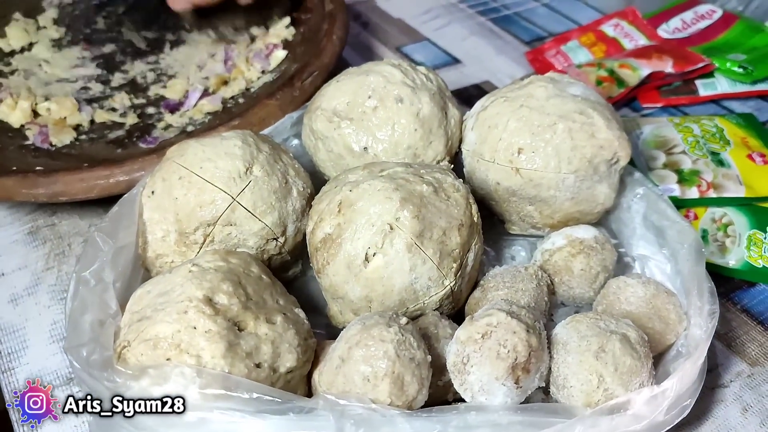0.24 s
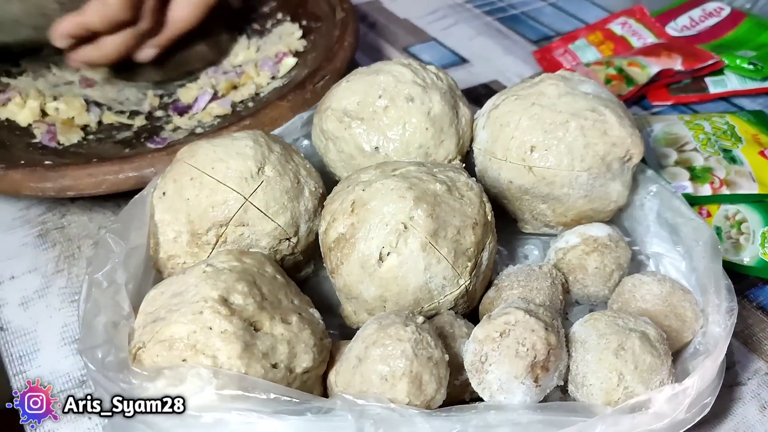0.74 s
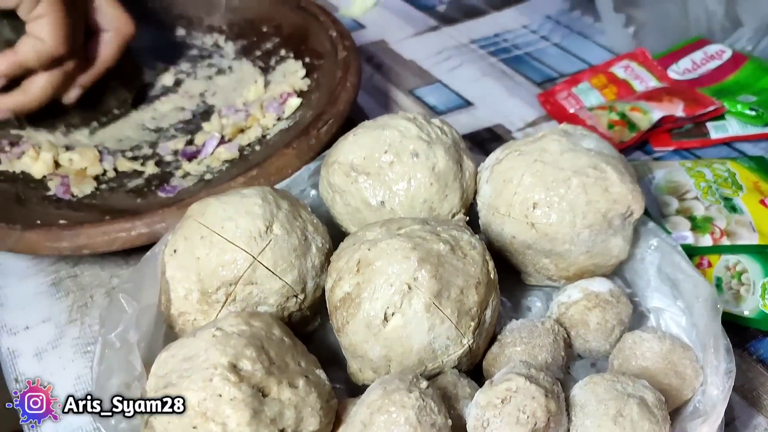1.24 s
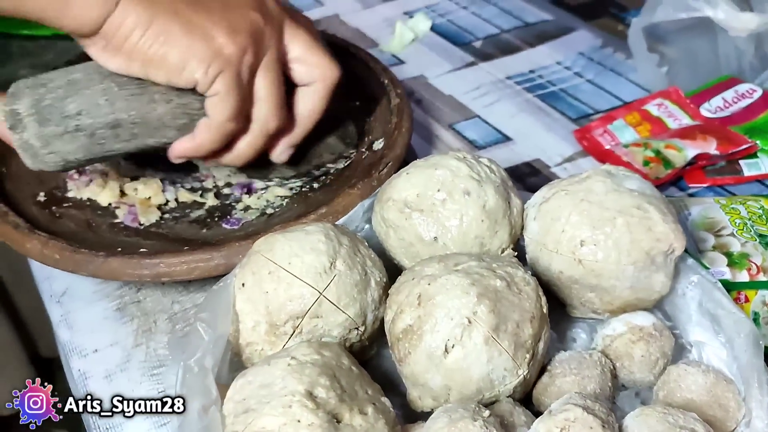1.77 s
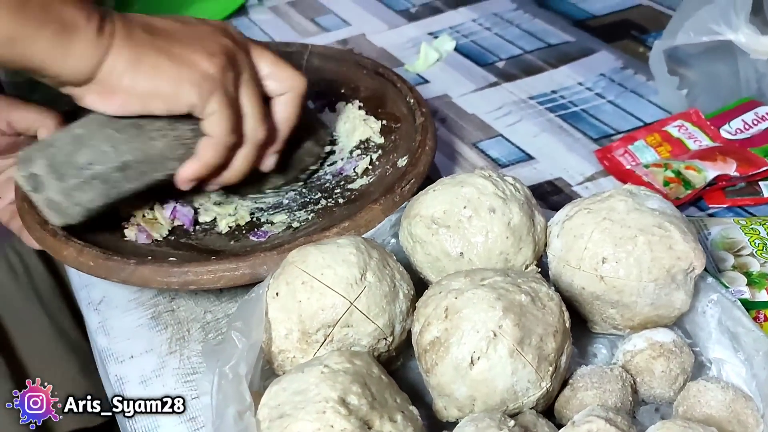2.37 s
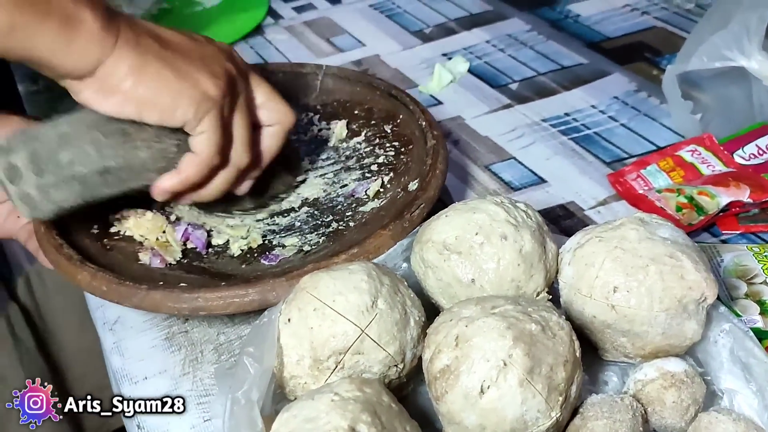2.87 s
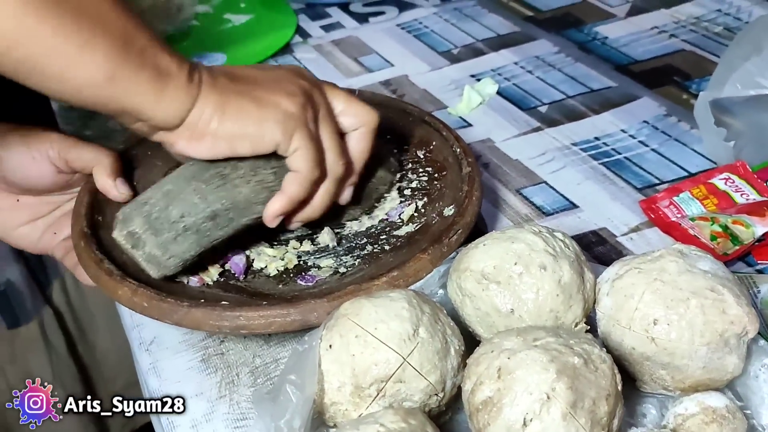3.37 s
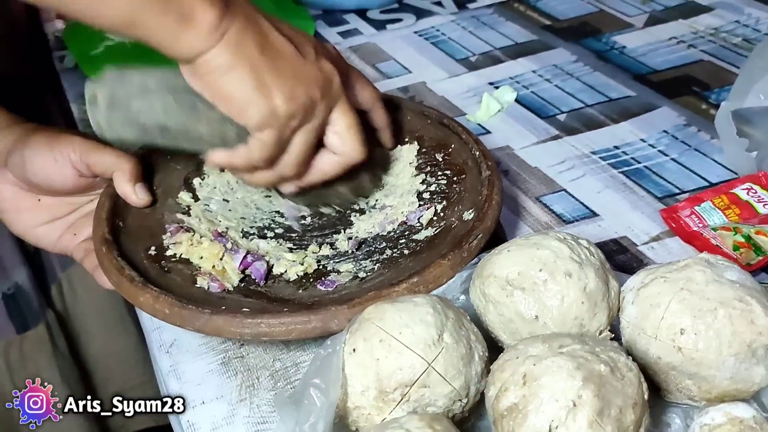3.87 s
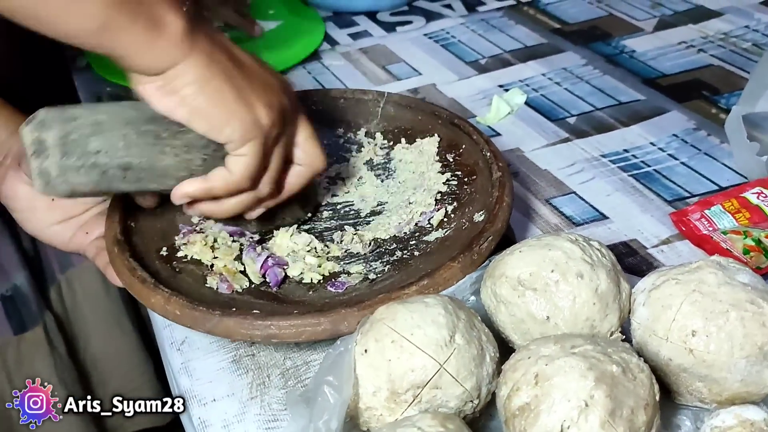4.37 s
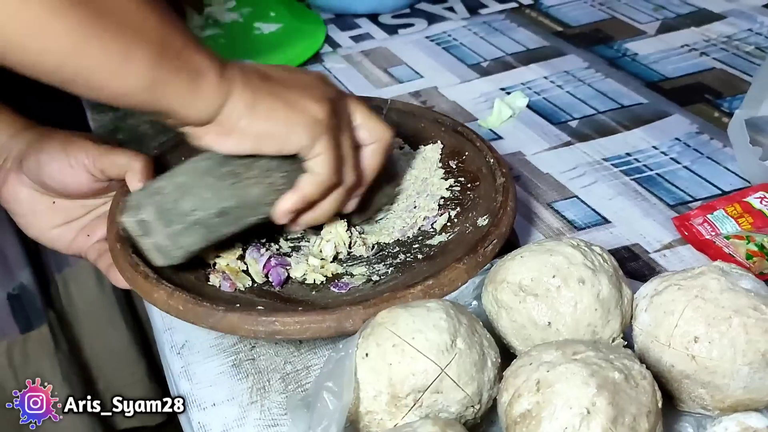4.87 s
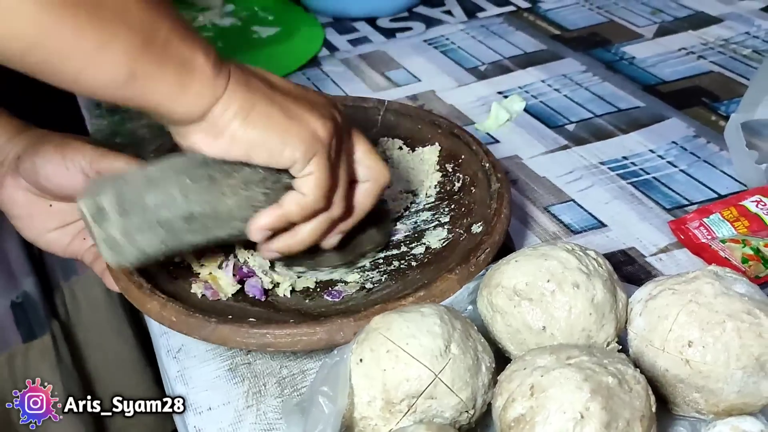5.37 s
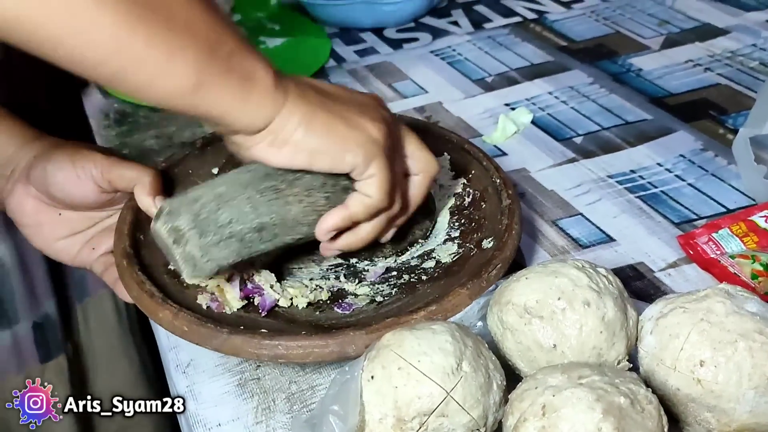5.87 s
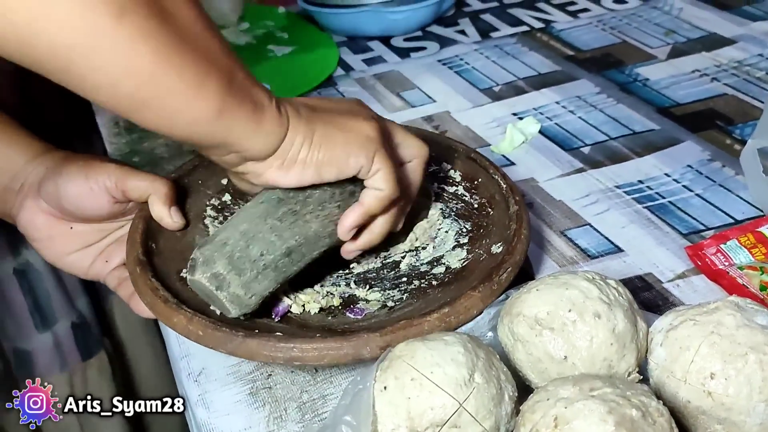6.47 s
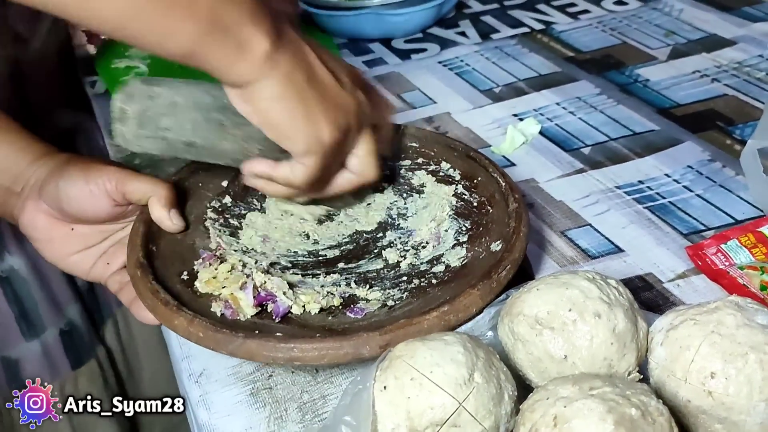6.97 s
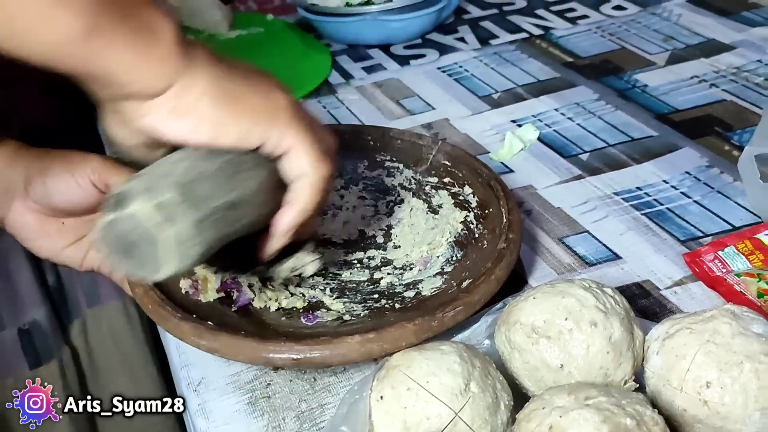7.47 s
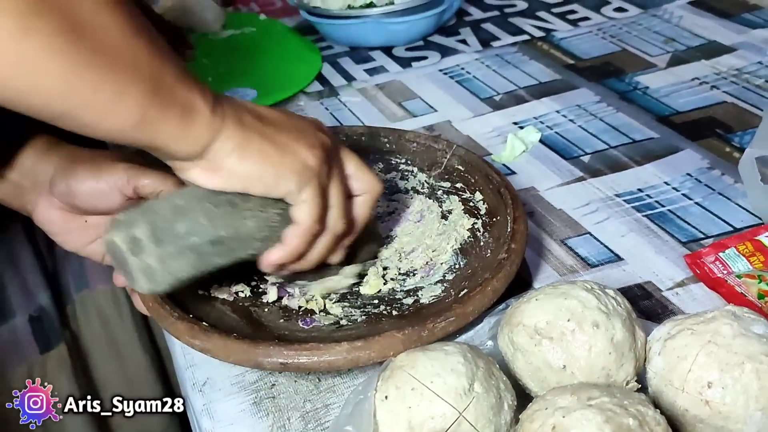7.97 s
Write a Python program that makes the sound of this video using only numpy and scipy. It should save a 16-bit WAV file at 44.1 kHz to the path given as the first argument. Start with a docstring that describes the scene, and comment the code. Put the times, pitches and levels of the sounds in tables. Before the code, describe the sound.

Quick, gritty scraping runs throughout as a stone pestle crushes moist spices in a clay dish on a kitchen table, heard up close with little echo. The strokes come in spells with very brief pauses, dotted with short clacks as the stone lands or jumps off a lump. Seeds click now and then and the table bumps softly underneath. The loudest sound, a deep thud of the dish settling, comes just before the end.

```python
"""Pestle grinding spices in a clay mortar

A stone pestle slides to and fro in spells, close by: grit rings the shallow dish, moist paste hisses,
seeds snap. The stone knocks on the clay as it lands or jumps off a lump. The dish rocks and thuds on
the kitchen table, which rumbles under the work."""
import sys
import numpy as np
from scipy import signal
from scipy.fft import rfft, irfft, next_fast_len
from scipy.io import wavfile
from scipy.ndimage import uniform_filter1d, map_coordinates

SR = 44100
rng = np.random.default_rng(int(sys.argv[2]) if len(sys.argv) > 2 else 0)


def int16_out(signal):
    """Quantize to a 16-bit WAV file."""
    q = np.round(np.clip(np.atleast_2d(signal).T, -1, 1) * 32767)
    wavfile.write(sys.argv[1], SR, q.astype(np.int16))


N = 362489
T = np.arange(N) / SR

# modes of the dish: (frequency [Hz], level [dB], t60 [s])
CLAY_MODES = [(371, -8.5, 0.039), (603, -10.5, 0.16), (780, -8.5, 0.094), (1110, -4.5, 0.011),
              (1288, 6.5, 0.027), (1476, 4, 0.025), (2130, -3.5, 0.031), (2512, -3, 0.023)]
# spectrum of crushed spice: (frequency [Hz], level [dB])
CRUNCH_SPECTRUM = [(300, 3), (1500, 14.5), (3200, 11.5), (6500, 4.5), (12000, -15)]
# pestle set down: (time [s], ring [dB], crunch [dB], thud [dB], push [Hz])
LANDINGS = [(0.342, -29.5, -47, -17.5, 156), (1.749, -17.5, -21, -21, 230), (2.697, -20, -31.5, -23.5, 228),
            (5.225, -23.5, -33, -27, 157), (6.111, -31.5, -40.5, -25.5, 217), (6.185, -16, -20, -20.5, 380)]
# stone jumps off a lump onto the clay: (time [s], ring [dB], crunch [dB])
KNOCKS = [(1.401, -16, -32.5), (1.879, -42, -31.5), (2.721, -29, -46), (2.804, -27, -37), (3.406, -25, -33),
          (3.776, -17, -22.5), (4.228, -20.5, -41), (4.867, -37, -39), (5.528, -27.5, -55),
          (6.859, -22, -34), (7.228, -38.5, -30.5), (7.795, -17.5, -25.5)]


def undb(db):
    """Decibels to gain."""
    return np.exp(np.asarray(db) * (np.log(10) / 20))


def unit(x):
    """Scale to rms 1."""
    return x / np.sqrt(np.mean(x ** 2))


def butter(x, order, hz, kind="low"):
    """Butterworth filter."""
    return signal.sosfilt(signal.butter(order, hz, kind, fs=SR, output="sos"), x)


def gain_at(outline, hz):
    """Gain of a (Hz, dB) outline on a log-frequency axis."""
    f, db = np.transpose(outline)
    return undb(np.interp(np.log(hz + 1), np.log(f), db))


def convolve(x, response):
    """Convolve, keeping the length; rows are channels."""
    return signal.oaconvolve(np.atleast_2d(x), np.atleast_2d(response), axes=-1)[:, :x.shape[-1]]


def colour(x, outline, size=4096):
    """Minimum-phase filter with a (Hz, dB) outline."""
    cepstrum = irfft(np.log(gain_at(outline, np.arange(size // 2 + 1) * SR / size)))
    cepstrum[1:size // 2] *= 2
    cepstrum[size // 2 + 1:] = 0
    return convolve(x, irfft(np.exp(rfft(cepstrum))))


def add(out, time_s, x, db):
    """Mix in a blow; db is the rms of its loudest 10 ms."""
    i = int(time_s * SR)
    x = x[:, :N - i]
    loudest = np.max(uniform_filter1d(np.mean(x ** 2, axis=0), SR // 100, mode="constant"))
    out[:, i:i + x.shape[1]] += x * undb(db) / np.sqrt(loudest)


def wander(rate_hz):
    """Smooth random drift, rms 1."""
    hold = int(SR / rate_hz)
    steps = np.repeat(rng.standard_normal(N // hold + 1), hold)
    return unit(uniform_filter1d(uniform_filter1d(steps, hold), hold)[:N])


def swells(events):
    """Bell-shaped gain for each (time [s], half length [s], level [dB])."""
    time_s, half_s, db = np.transpose(events)[:, :, None]
    t = T[::100]
    bells = undb(db) * np.exp(-((t - time_s) / half_s) ** 2 / 2)
    return np.interp(T, t, np.sum(bells, axis=0))


def grains(per_s, spread_db=0):
    """Tiny fractures: mostly small, a few large."""
    size = undb(spread_db * np.minimum(rng.exponential(size=N), 5))
    return unit((rng.random(N) < per_s / SR) * size * rng.standard_normal(N))


def patchy(x, depth_db=2.5, width_hz=300, hold_s=0.024):
    """The stone rides over lumps: narrow bands flare and fade at random."""
    hz, t, spectrum = signal.stft(x, SR, nperseg=512)
    lumps = rng.standard_normal((128, 1024))
    grid = np.meshgrid(hz / width_hz, t / hold_s, indexing="ij")
    flare_db = depth_db * map_coordinates(lumps, grid, mode="mirror")
    return signal.istft(spectrum * unit(undb(flare_db)), SR)[1][:, :N]


def ring(modes, t, scatter_db, rad_per_khz=0.25):
    """Stereo modal response: each contact reweights the modes; high ones radiate unevenly."""
    hz, db, t60_s = np.transpose(modes)[:, :, None]
    weight, side = rng.standard_normal((2, len(modes), 1))
    decay = undb(db + scatter_db * weight) * np.exp(-np.log(1000) * t / t60_s)
    phase = rad_per_khz * side * hz / 1000
    return np.array([np.sum(decay * np.sin(2 * np.pi * hz * t + ear * phase), axis=0) for ear in (-1, 1)])


def room(x, wet_db, t60_s, echo=0):
    """Direct sound, optional wall echo and a diffuse tail with its bass alike in both ears."""
    t = T[:SR // 4]
    mid, side = rng.standard_normal((2, len(t)))
    diffuse = mid + np.array([[1], [-1]]) * butter(side, 2, 480, "high")
    tail = diffuse * np.exp(-np.log(1000) * t / t60_s) * (1 - np.exp(-t / 0.0023))
    response = unit(tail) * undb(wet_db) / np.sqrt(len(t))
    response[:, 0] += 1
    response[:, int(0.0118 * SR)] += echo
    return convolve(x, response)


def room_tone():
    """Shared bass and a faint hiss in each ear."""
    # (frequency [Hz], level [dB])
    spectrum = [(200, -4), (900, -19), (2500, -21), (15500, -53)]
    bass = unit(colour(rng.standard_normal(N), spectrum)) * undb(-55)
    return bass + undb(-84) * rng.standard_normal((2, N))


def table_rumble(hiss_db, follow=0.21):
    """The table shudders under the work, most as the dish is first leant on."""
    # (frequency [Hz], level [dB])
    spectrum = [(15, -5.5), (28, 5.5), (65, -1.5), (90, -7), (120, -1), (160, -14.5), (800, -57.5)]
    # base shudder: (time [s], level [dB])
    shudder = [(0.06, -29.5), (0.2, -40.5), (7.0, -43.5)]
    effort_db = uniform_filter1d(hiss_db - np.mean(hiss_db), SR // 8)
    level_db = np.interp(T, *np.transpose(shudder)) + follow * effort_db + 2 * wander(12)
    return unit(colour(rng.standard_normal(N), spectrum)) * undb(level_db)


def pushes(knock_db=-9, knock_hz=370, rock_hz=164.6, rock_db=-33, db_per_octave=17):
    """Pushes of the dish on the table: (time [s], level [dB], pitch [Hz]); harder rocks are higher."""
    # dish rocks as the weight shifts: (time [s], level [dB])
    rocks = [(0.203, -22), (0.263, -31.5), (0.536, -34), (0.904, -30), (1.179, -30), (1.566, -27),
             (1.618, -32), (2.305, -33), (2.596, -32), (2.733, -28.5), (3.266, -33), (4.099, -32),
             (4.467, -35), (5.101, -34.5), (6.03, -33), (6.745, -29.5)]
    landed = [(time_s + 0.0028, db, hz) for time_s, _, _, db, hz in LANDINGS]
    knocked = [(time_s, db + knock_db, knock_hz) for time_s, db, _ in KNOCKS]
    rocked = [(time_s, db, rock_hz * 2 ** ((db - rock_db) / db_per_octave)) for time_s, db in rocks]
    return landed + knocked + rocked


def table_thuds(decay_cycles=0.42, direct=0.062, rattle_s=0.01, detune=0.038):
    """The dish pushes on the table and springs back; a shorter push reaches higher modes."""
    # loaded table: (frequency [Hz], level [dB], t60 [s])
    table_modes = [(121.5, 3, 0.095), (241.5, -1, 0.07), (278, 5, 0.046), (387.3, 2.5, 0.087),
                   (559, 2.5, 0.079)]
    out, t = np.zeros((2, N)), T[:SR // 4]
    for time_s, db, hz in pushes():
        push = np.sin(2 * np.pi * hz * t) * np.sqrt(hz * t) * np.exp(-hz * t / decay_cycles)
        # the hand leans differently each time, shifting the modes
        modes = [(f * (1 + detune * rng.standard_normal()), level, t60) for f, level, t60 in table_modes]
        board = ring(modes, t, scatter_db=1.5)
        # the rough foot rattles, more after a heavy blow
        rattle = rng.standard_normal((2, len(t))) * np.exp(-t / rattle_s)
        rattle = butter(rattle, 3, [250, 720], "band")
        parts = (convolve(push, board), 1), (push, direct), (rattle, undb(-6 + 0.45 * db))
        blow = sum(share * x / np.max(abs(x)) for x, share in parts)
        add(out, time_s + 0.0012, room(blow, wet_db=-3, t60_s=0.23), db)
    return out


def dish_drop(time_s=7.789, db=-6, swing_hz=114.7, swing_s=0.0065, t60_s=0.24):
    """The tipped dish drops back: the table swings, then the rough foot rumbles to rest."""
    out, t = np.zeros((2, N)), T[:SR // 2]
    swing = np.sin(2 * np.pi * swing_hz * t) * (t / swing_s) ** 2 * np.exp(2 * (1 - t / swing_s))
    jolts = butter(rng.standard_normal(len(t)), 2, [45, 160], "band")
    settling = np.tanh(unit(jolts)) * np.exp(-np.log(1000) * t / t60_s)
    add(out, time_s, np.atleast_2d(swing + 2 * undb(-7) * settling), db)
    return out


def seed_snaps(decay_s=0.0011):
    """A seed or skin gives way with one bright click."""
    # (time [s], level [dB])
    snaps = [(0.143, -43), (1.882, -31), (3.134, -45), (4.686, -32), (6.5802, -36), (7.017, -32.5)]
    out, t = np.zeros((2, N)), T[:SR // 4]
    for time_s, db in snaps:
        crack = rng.standard_normal((2, len(t))) * np.exp(-t / decay_s)
        crack = butter(crack, 1, [7500, 14500], "band")
        add(out, time_s, room(crack, wet_db=-6.5, t60_s=0.11), db)
    return out


def spice_crushes():
    """A piece collapses under the sliding stone in a swarm of fractures."""
    # (time [s], half length [s], level [dB])
    crushes = [(0.852, 0.014, -27.5), (1.226, 0.015, -31.5), (2.275, 0.009, -40), (2.814, 0.008, -31.5),
               (4.013, 0.009, -27), (4.05, 0.035, -34.5), (7.055, 0.019, -30.5)]
    swarm = np.array([grains(per_s=3300, spread_db=0.5) for _ in range(2)])
    return unit(patchy(colour(swarm, CRUNCH_SPECTRUM))) * swells(crushes)


def pestle_knocks(crush_s=0.0028, crush_decay_s=0.0017, cushion_hz=1600, detune=0.012, choke_t60_s=0.052):
    """The stone strikes the clay, then crushes what lies beneath."""
    out, t = np.zeros((2, N)), T[:SR // 8]
    for time_s, ring_db, crunch_db, *_ in LANDINGS + KNOCKS:
        # brief contact chatter, cushioned by the paste
        contact = 0.27 * rng.standard_normal(len(t)) * np.exp(-t / 0.0057)
        contact[0] += 1
        contact = butter(contact, 1, cushion_hz)
        # each blow loads the dish differently; the stone stays down and chokes the ring
        modes = [(hz * (1 + detune * rng.standard_normal()), db, 1 / (1 / t60_s + 1 / choke_t60_s))
                 for hz, db, t60_s in CLAY_MODES]
        clay = convolve(contact, ring(modes, t, scatter_db=-1.7))
        add(out, time_s, room(clay, wet_db=-4.5, t60_s=0.19, echo=0.31), ring_db)
        crush = rng.standard_normal((2, len(t))) * np.exp(-abs(t - crush_s) / crush_decay_s)
        add(out, time_s, room(colour(crush, CRUNCH_SPECTRUM), wet_db=-7.5, t60_s=0.18), crunch_db)
    return out


def drag_power(t, touch_s=0.0073, lift_db_per_s=200, idle_db=-65.5):
    """Light rubbing while the pestle is down, over a faint rustle of hands."""
    # grinding spells: (touchdown [s], lift [s], drag [dB])
    spells = [(0.0, 0.158, -48.5), (0.328, 1.556, -49.5), (1.752, 2.594, -49), (2.704, 5.13, -51),
              (5.227, 5.994, -48.5), (6.188, 7.475, -49), (7.654, 8.21, -51.5)]
    down_s, up_s, db = np.transpose(spells)[:, :, None]
    touch = np.clip((t - down_s) / touch_s, 0, 1)
    drag = touch * undb(db - lift_db_per_s * np.maximum(t - up_s, 0))
    return undb(idle_db) ** 2 + np.sum(drag ** 2, axis=0)


def stroke_levels(shape=1.99, bite_width=0.66, drag_grit_db=-10, halt_half_s=0.031, halt_depth_db=-6.5):
    """Hiss, grit and judder in dB: a stroke swells over the drag and bites in its middle."""
    # slides: (time of top speed [s], half length [s], hiss [dB], grit [dB], judder [dB])
    strokes = [(0.064, 0.045, -43, -36, -36.5), (0.464, 0.05, -41, -36.5, -37),
               (0.655, 0.058, -46.5, -41, -44), (0.857, 0.039, -41, -40, -37),
               (1.021, 0.066, -44, -38, -37), (1.245, 0.064, -43, -37.5, -43.5),
               (1.399, 0.054, -41, -35, -45), (1.914, 0.052, -42, -37.5, -36),
               (2.081, 0.047, -40, -36.5, -29.5), (2.271, 0.05, -44, -39, -37.5),
               (2.432, 0.047, -44.5, -45.5, -46), (2.83, 0.042, -35.5, -35.5, -36),
               (3.021, 0.05, -42.5, -42.5, -48), (3.224, 0.045, -39.5, -39, -41),
               (3.406, 0.044, -38.5, -33, -39), (3.607, 0.044, -37.5, -34, -39),
               (3.785, 0.06, -40.5, -37, -45), (4.038, 0.091, -38.5, -38.5, -46.5),
               (4.215, 0.059, -38.5, -34.5, -36.5), (4.408, 0.05, -35.5, -50, -44.5),
               (4.585, 0.048, -38.5, -34, -38.5), (4.761, 0.045, -36.5, -37, -41.5),
               (4.934, 0.052, -39, -35.5, -37), (5.341, 0.038, -40, -33, -38.5),
               (5.526, 0.056, -41, -37, -36.5), (5.716, 0.041, -40, -34, -34.5),
               (5.867, 0.041, -46, -37, -36.5), (6.287, 0.081, -41.5, -36.5, -41.5),
               (6.512, 0.048, -43, -35.5, -41.5), (6.701, 0.045, -36.5, -38.5, -33.5),
               (6.873, 0.052, -45.5, -39, -37), (7.063, 0.038, -42, -30.5, -37),
               (7.148, 0.052, -43.5, -38, -50), (7.297, 0.051, -40.5, -36, -40),
               (7.794, 0.059, -36.5, -38.5, -42.5), (7.971, 0.036, -37.5, -48.5, -45),
               (8.13, 0.041, -38, -42, -39.5)]
    # stone catches at a turn: (time [s])
    halts = [0.768, 3.108, 6.61]
    time_s, half_s, hiss_db, grit_db, judder_db = np.transpose(strokes)[:, :, None]
    t = T[::100]
    away = abs((t - time_s) / half_s) ** shape
    drag = drag_power(t)
    hiss = drag + np.sum(undb(hiss_db) ** 2 * np.exp(-away), axis=0)
    bite = np.exp(-away / bite_width ** 2)
    grit, judder = (drag * undb(drag_grit_db) ** 2 + np.sum(undb(db) ** 2 * bite, axis=0)
                    for db in (grit_db, judder_db))
    halted = np.exp(-((t - np.array(halts)[:, None]) / halt_half_s) ** 4)
    halt_db = halt_depth_db * np.sum(halted, axis=0)
    return [np.interp(T, t, 10 * np.log10(power) + halt_db) for power in (hiss, grit, judder)]


def paste_ticks(re_drag_db=-6):
    """Wet paste peels off the stone in sparse, tiny ticks."""
    ticks = room(grains(per_s=70), wet_db=1, t60_s=0.011)
    return unit(butter(ticks, 2, 8000, "high")) * np.sqrt(drag_power(T)) * undb(re_drag_db)


def stone_judder(judder_db):
    """Coarse stick-slip jolts give a heavy stroke its low body."""
    jolts = butter(grains(per_s=900, spread_db=1), 2, [210, 850], "band")
    return unit(patchy(room(jolts, wet_db=2, t60_s=0.026))) * undb(judder_db - 1)


def stone_chatter():
    """Fast stick-slip on bare clay, near the dish's strongest modes."""
    # stone breaks through the paste: (time [s], half length [s], level [dB])
    scrapes = [(3.592, 0.013, -44), (4.08, 0.071, -54.5), (4.19, 0.01, -36.5), (4.556, 0.011, -52.5)]
    slips = butter(grains(per_s=2400, spread_db=2.5), 2, [1330, 1750], "band")
    return unit(slips) * swells(scrapes)


def paste_hiss(hiss_db, split_hz=5000):
    """Shearing paste: wet patches fizz, dry ones scratch, so the two bands trade places."""
    # (frequency [Hz], level [dB])
    spectrum = [(200, -10), (1000, -1), (2400, 2.5), (7000, 4.5), (11700, 2.5), (14300, -1.5)]
    shear = unit(colour(np.array([grains(per_s=9000) for _ in range(2)]), spectrum))
    scratch = butter(shear, 1, split_hz)
    fizz = shear - scratch
    wetness = undb(2.37 * wander(11))
    return (scratch / wetness + fizz * wetness) * undb(hiss_db + 0.5 + 1.37 * wander(110))


def clay_ring(force, wander_db=3.5, press_t60_s=0.12):
    """The pressing stone damps the dish; modes come and go as the contact travels."""
    out, energy = 0, 0
    for hz, db, t60_s in CLAY_MODES:
        damped_t60_s = 1 / (1 / t60_s + 1 / press_t60_s)
        response = ring([(hz, db, damped_t60_s)], T[:SR // 12], scatter_db=1.5, rad_per_khz=0.89)
        out = out + convolve(force * undb(wander_db * wander(15)), response)
        energy += np.sum(response ** 2) / 2
    return out / np.sqrt(energy)


def grinding(hiss_db, grit_db):
    """Grit catches, breaks and rings the dish, amid the finer hiss of the paste."""
    # (frequency [Hz], level [dB])
    grit_spectrum = [(200, -14.5), (950, -9.5), (1500, 3), (1850, -5.5), (2600, -4.5), (4500, -8.5),
                     (15000, -24)]
    grit_gain = undb(grit_db + 2.25 * wander(70))
    caught = grains(per_s=1500, spread_db=0.95) * grit_gain
    loose = np.array([grains(per_s=4000) for _ in range(2)]) * grit_gain
    rasp = colour(caught + loose, grit_spectrum) * undb(8 + 1.3 * wander(20))
    paste = paste_hiss(hiss_db)
    clay = clay_ring(caught * undb(-4.5) + stone_chatter())
    return patchy(room(clay + rasp, wet_db=-5.5, t60_s=0.059) + paste)


def scene():
    """All sources; the treble reaches the right more directly, the left leads by 4 samples."""
    # (frequency [Hz], left minus right [dB])
    balance = [(100, -2.5), (2200, -0.5), (8000, -7.5), (14000, -5.5)]
    hiss_db, grit_db, judder_db = stroke_levels()
    mix = grinding(hiss_db, grit_db) + stone_judder(judder_db) + spice_crushes() + paste_ticks()
    mix += pestle_knocks() + table_thuds() + dish_drop() + seed_snaps()
    mix += table_rumble(hiss_db) + room_tone()
    mix[1] = np.roll(mix[1], 4)
    size = next_fast_len(N, real=True)
    ratio = gain_at(balance, np.fft.rfftfreq(size, 1 / SR))
    ears = np.array([ratio, np.ones_like(ratio)]) * np.sqrt(2 / (1 + ratio ** 2))
    return irfft(rfft(mix, size) * ears, size)[:, :N]


def record(dry, dip_hz=8450, top_hz=15600):
    """Narrow treble dip of the microphone, clipping at full scale, steep low-pass."""
    dipped = 0.7 * signal.lfilter(*signal.iirnotch(dip_hz, Q=14, fs=SR), dry) + 0.3 * dry
    lowpass = signal.ellip(10, 0.2, 70, top_hz, fs=SR, output="sos")
    return signal.sosfilt(lowpass, np.clip(dipped, -1, 1))


dry = scene()
out = record(dry)
int16_out(out)
```